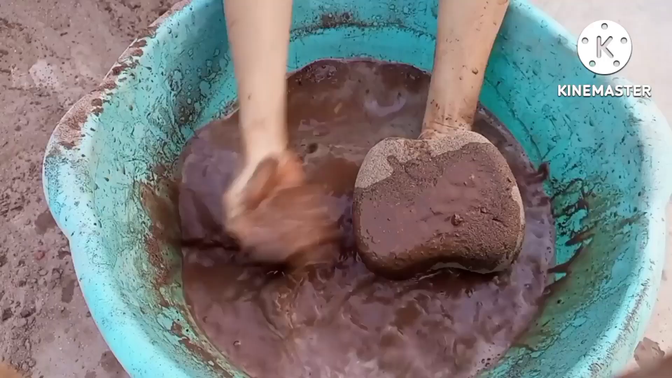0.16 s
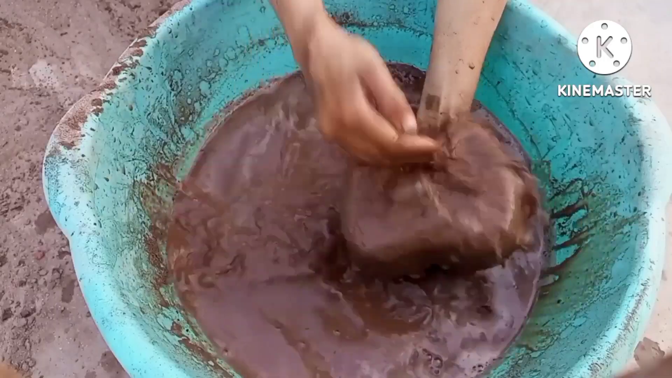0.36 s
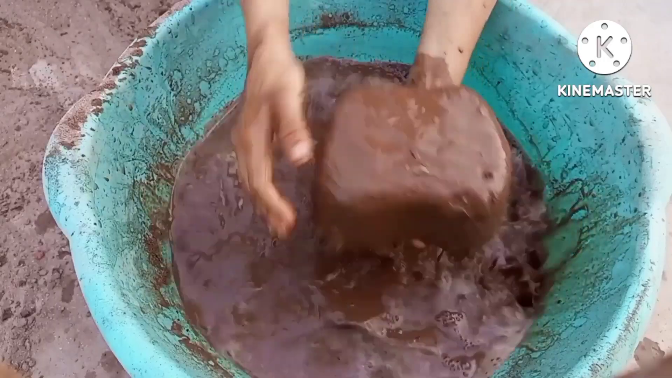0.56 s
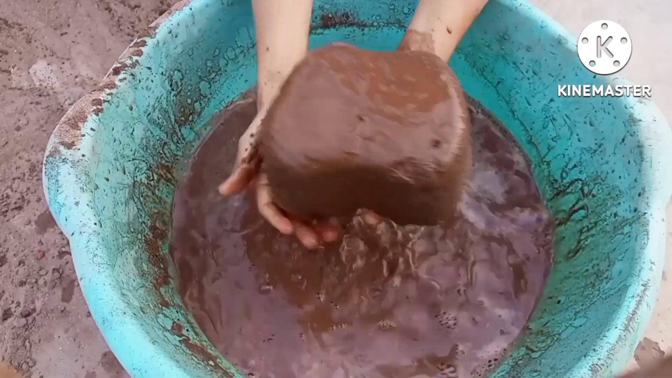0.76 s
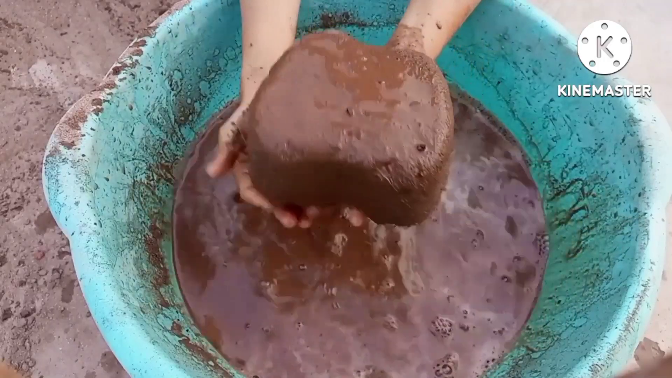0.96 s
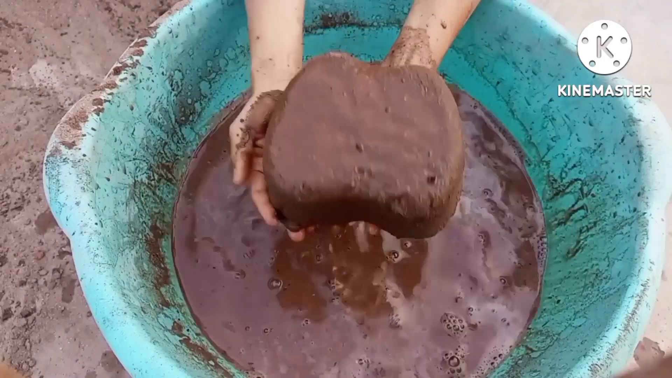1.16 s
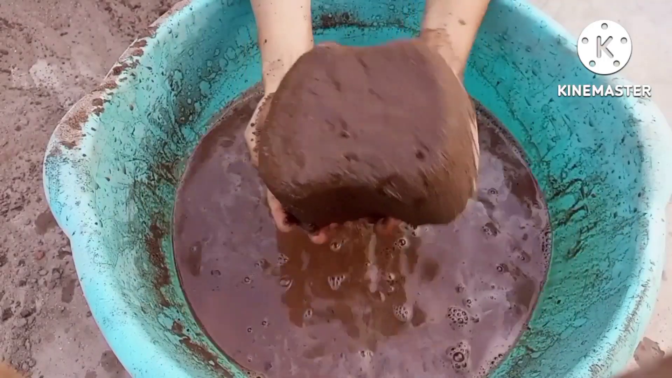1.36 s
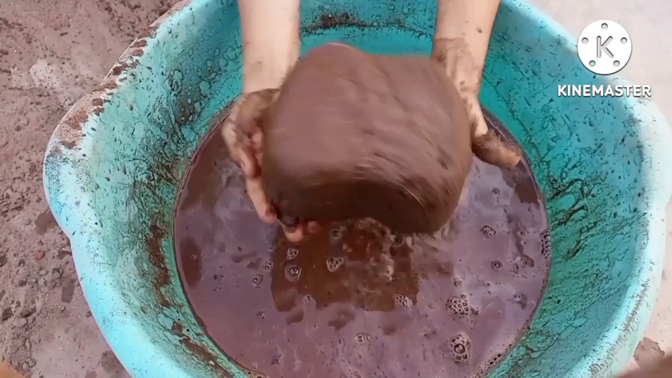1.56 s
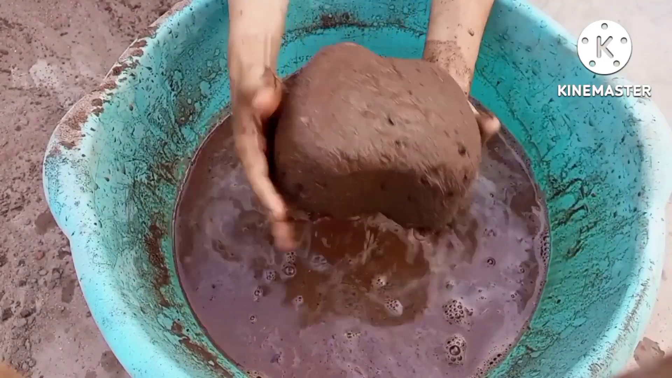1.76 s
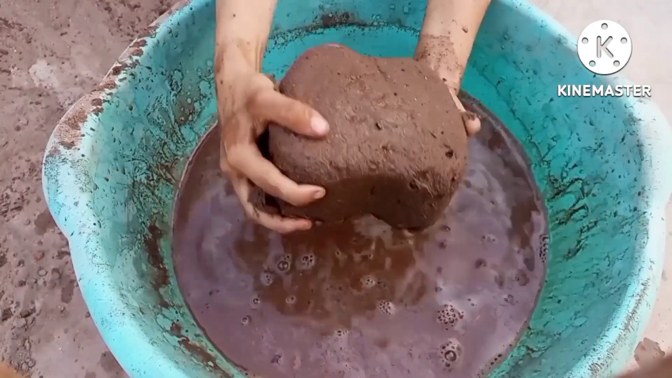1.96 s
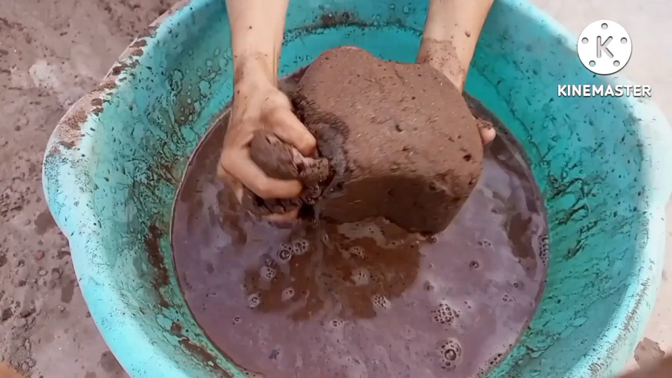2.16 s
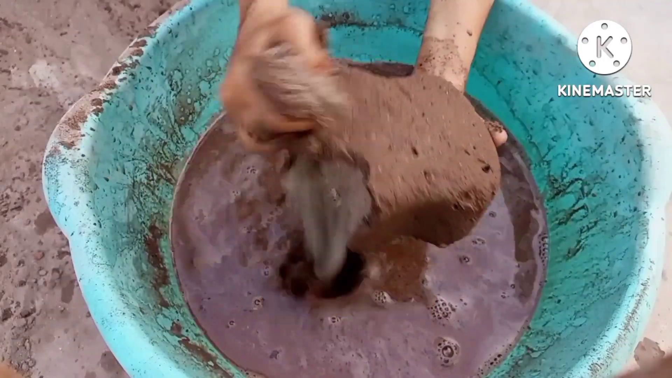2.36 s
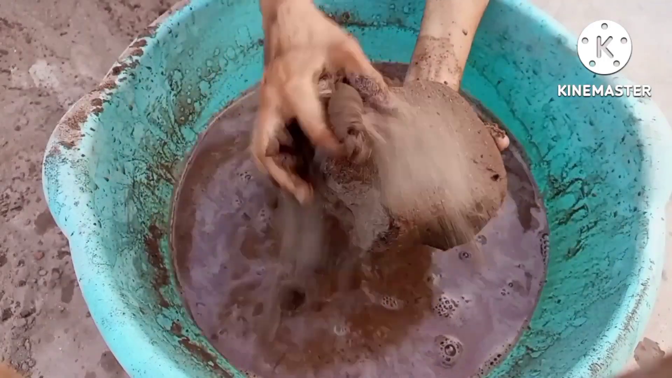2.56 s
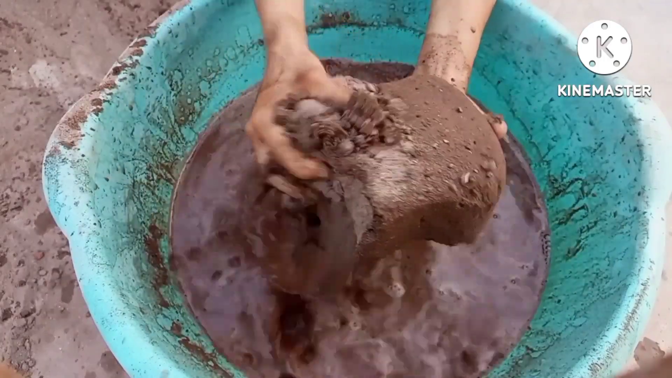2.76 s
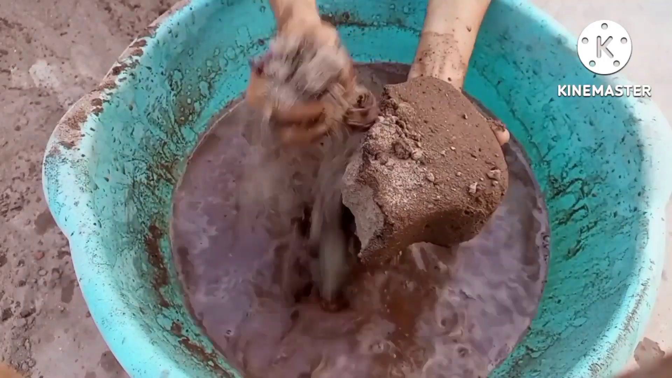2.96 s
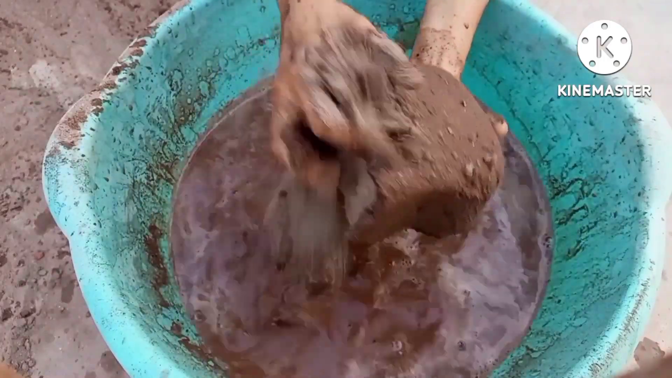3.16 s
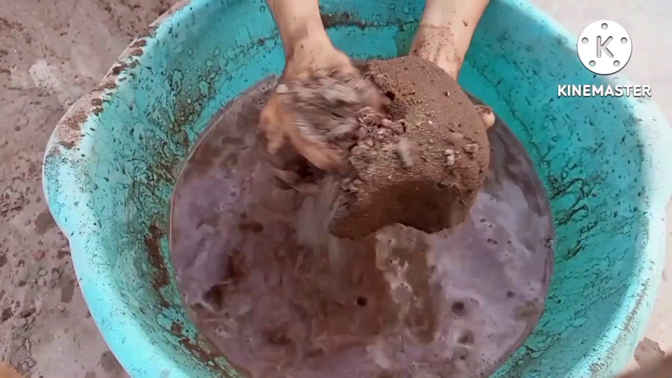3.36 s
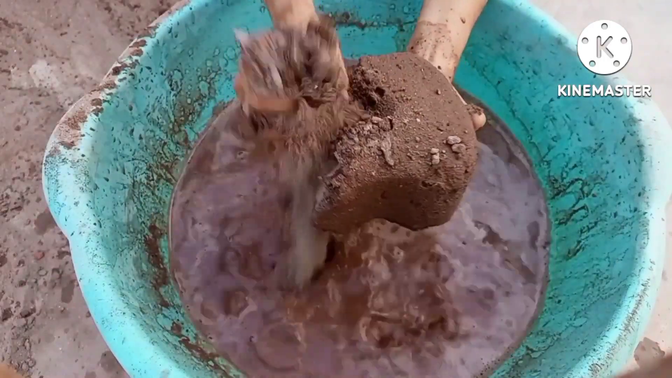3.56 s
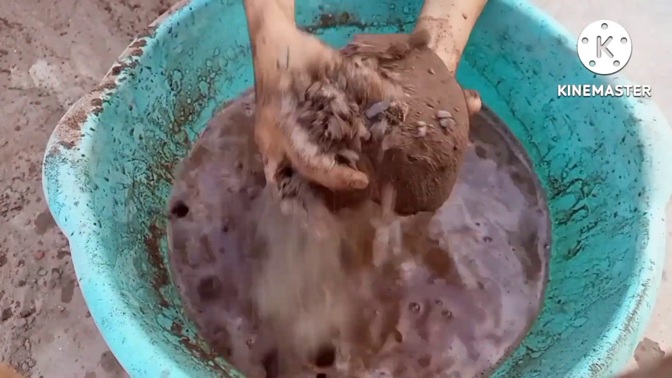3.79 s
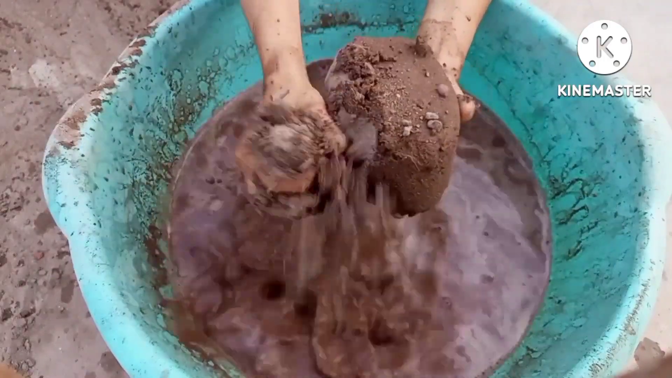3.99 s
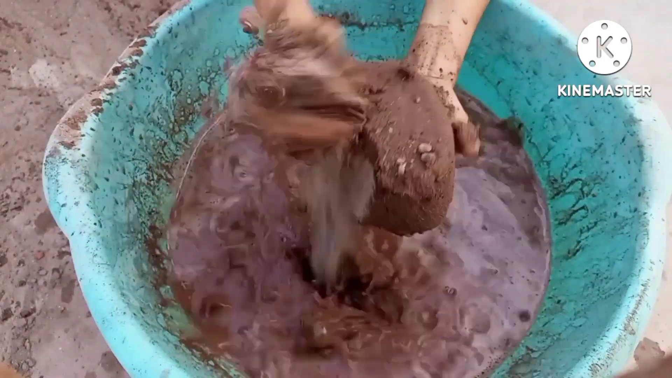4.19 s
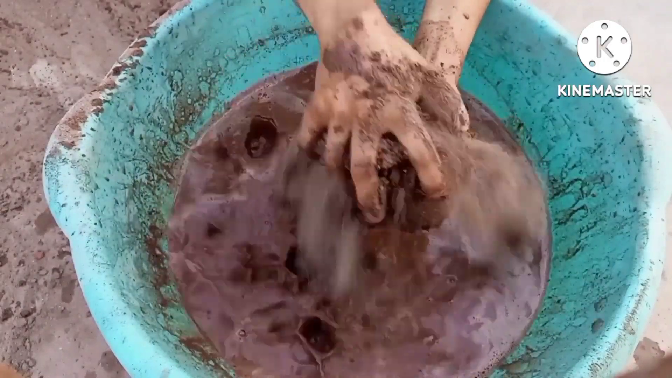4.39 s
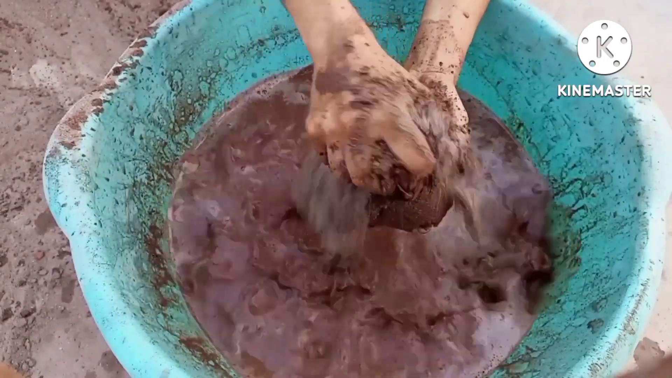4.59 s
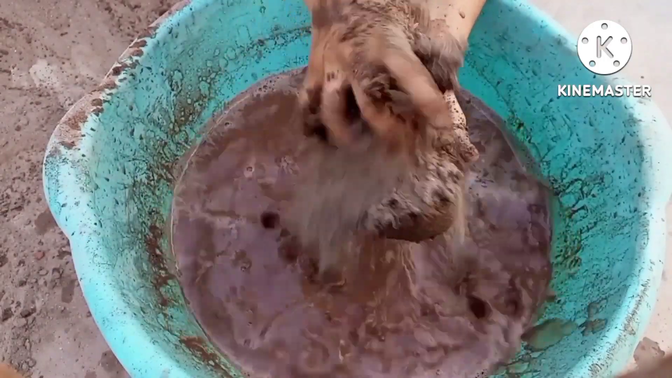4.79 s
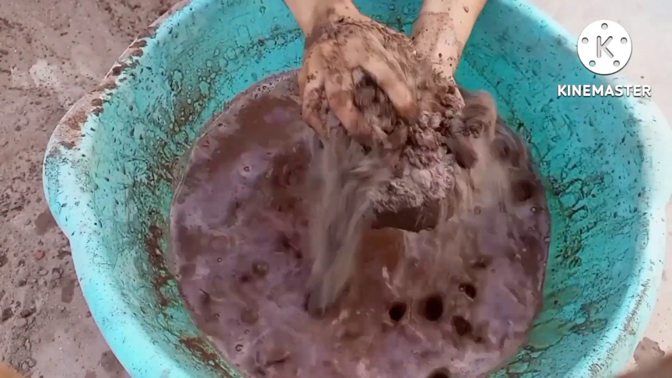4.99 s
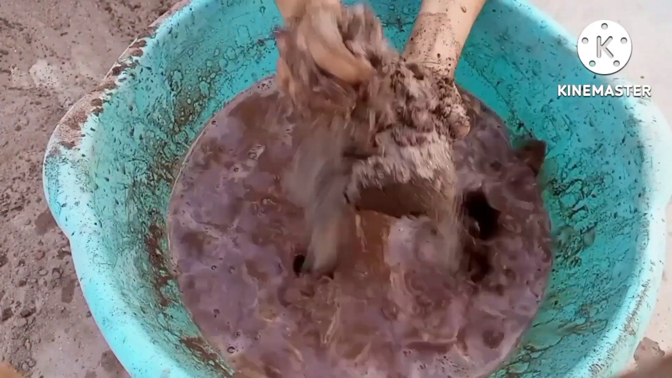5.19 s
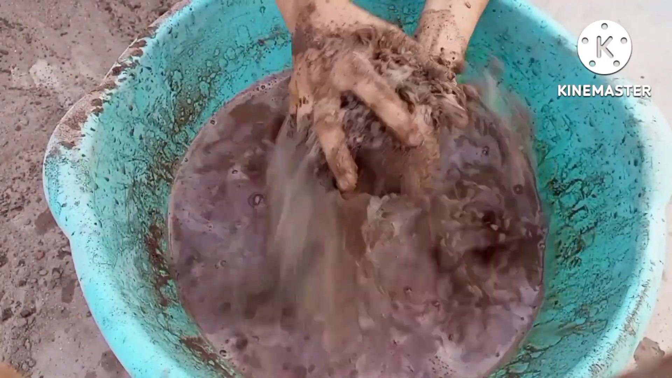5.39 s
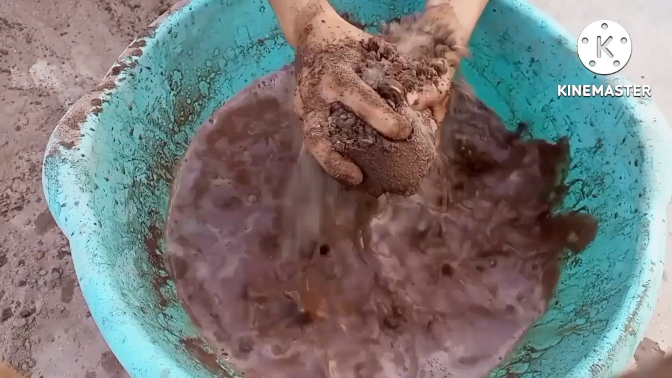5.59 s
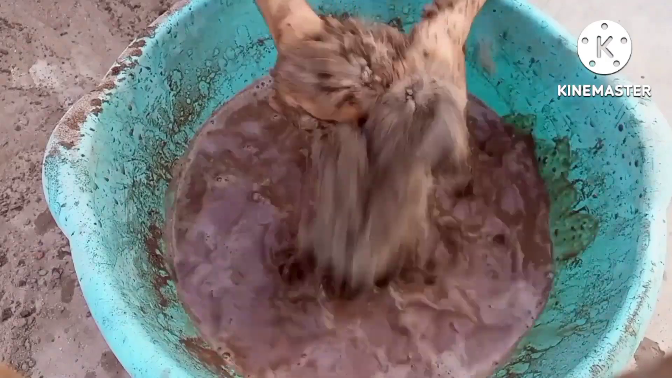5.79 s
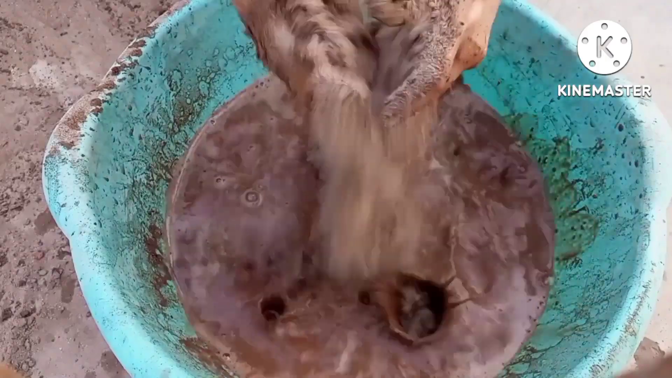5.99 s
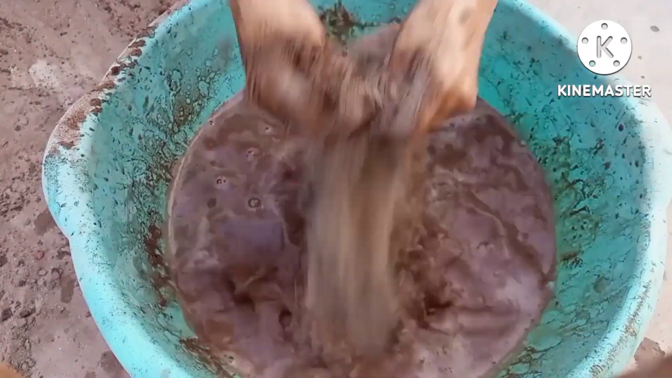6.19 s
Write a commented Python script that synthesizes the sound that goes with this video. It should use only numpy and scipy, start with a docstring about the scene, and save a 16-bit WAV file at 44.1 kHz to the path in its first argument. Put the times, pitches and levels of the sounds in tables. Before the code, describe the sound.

Close-up crumbling of a wet sand block over a tub of water: dripping, a lull, then gritty pattering, sharp splashes and bubbly plops.

```python
"""Drops and sand fall at once into muddy water in a plastic tub: flurries of bubbles over a fizz of grains.
Sharp splats and ringing bubbles join in; just before 1 s gusts of wind rumble on the close microphone.
After a lull, fingers dig with a smooth hiss from 2.2 s into a block of wet sand held over the water.
The heaviest falls come near 3 s and overload the microphone; crumbling lumps patter on to the end.
Resonances and a short echo give the tub's colour; rubbing, wind and air noise are heard without it."""
import sys
import numpy as np
from scipy import signal
from scipy.fft import rfft, irfft, next_fast_len
from scipy.io import wavfile
from scipy.ndimage import uniform_filter1d

SR = 44100
rng = np.random.default_rng(int(sys.argv[2]) if len(sys.argv) > 2 else 0)


def makeup_ratio(level_db):
    """Linear amplitude ratio for a level in decibels (20 dB per factor of ten)."""
    decades = np.asarray(level_db, float) / 20
    return 10 ** decades


def to_wav(s):
    """Save 16-bit WAV."""
    ch = np.atleast_2d(s).T  # columns
    pcm = np.round(np.clip(ch, -1, 1) * 32767)  # PCM
    wavfile.write(sys.argv[1], SR, pcm.astype(np.int16))


N = 275184


def evened(x):
    """Scales to rms 1."""
    return x / np.sqrt(np.mean(x ** 2) + 1e-20)


def curve(rows, column):
    """Draws one column of a table as straight lines, sample by sample."""
    table = np.array(rows)
    return np.interp(np.arange(N) / SR, table[:, 0], table[:, column])


def add(mix, s, sound):
    """Mixes a sound in at a time in seconds."""
    part = mix[round(s * SR):][:len(sound)]
    part += sound[:len(part)]


def impulses(rows, delay_s=0):
    """One click for each (time [s], level [dB]) row."""
    clicks = np.zeros(N)
    for s, db in rows:
        add(clicks, s + delay_s, makeup_ratio([db]))
    return clicks


def coloured(x, points):
    """Filters by a spectrum of (frequency [Hz], level [dB]) points, joined on a log frequency scale."""
    size = next_fast_len(len(x))
    hz, db = np.transpose(points)
    shape = np.interp(np.log(np.fft.rfftfreq(size, 1 / SR) + 1), np.log(hz), db)
    return irfft(rfft(x, size) * makeup_ratio(shape), size)[:len(x)]


def coloured_noise(points):
    """Steady noise of a given colour; rms 1."""
    return evened(coloured(rng.standard_normal(N), points))


def smooth_noise(window):
    """Slow random drift, averaged twice over a window in samples; rms 1."""
    return evened(uniform_filter1d(uniform_filter1d(rng.standard_normal(N), window), window))


def sparse(per_s, spread_db):
    """Random clicks, a few much larger than the rest."""
    size = makeup_ratio(spread_db * np.minimum(rng.exponential(1, N), 4))
    sign = rng.choice([-1., 1.], N)
    return size * sign * (rng.random(N) < per_s / SR)


def lump(rise, fall):
    """An envelope that builds up to time zero at its middle and then dies (time constants in s); peak 1."""
    t = np.arange(-4000, 4001) / SR
    return np.exp(np.where(t < 0, t / rise, -t / fall))


def bubble(hz, cycles, glide, swell=.32):
    """A pocket of air swells in, rings down and slides in pitch; envelope peak 1."""
    # u counts time in spans of the given number of cycles
    u = np.arange(int(3 * cycles / hz * SR) + 2) / SR * hz / cycles
    rise = (u / swell) ** 2 * np.exp(2 - 2 * u / swell)
    decay = np.exp(-1.6 * (u - swell) * (1 + u))
    shape = np.where(u < swell, rise, decay)
    return shape * np.sin(2 * np.pi * cycles * (u + glide * (u - .4) ** 2))


# thin trickle between the showers: (time [s], level before the mix [dB])
TRICKLE = [(0, -40), (.3, -40.5), (.66, -44), (1.0, -51), (1.2, -51), (1.9, -46), (2.4, -36.5), (2.8, -32),
           (3.35, -37), (3.75, -41.5), (4.1, -33.5), (4.25, -44), (4.55, -41.5), (4.9, -35.5), (5.1, -41),
           (5.5, -36.5), (5.87, -37.5), (6.24, -28.5)]
# trickle mix, one each for large drops, small drops, sand: (level [dB])
TRICKLE_MIX = [-10, -5, 2]
# water or sand shaken loose, coarseness up = big drops, down = fine sand:
# (start [s], length before the fade [s], level before the mix [dB], coarseness [dB])
SHOWERS = [(0.0, 0.017, -36, 4.5), (.205, 0.092, -28.5, -1.5), (0.348, 0.033, -28.5, 6.5),
           (0.428, 0.077, -30.5, 1), (.53, 0.085, -37, -4), (0.692, .11, -35.5, 2), (.89, 0.048, -33, 3.5),
           (1.04, 0.042, -60, -16), (1.65, 0.034, -67, 7), (1.97, 0.034, -42, 6), (2.26, 0.058, -38, -5),
           (2.65, 0.086, -37, -7), (2.81, 0.072, -28.5, 3.5), (2.93, .11, -25.5, -1.5),
           (3.059, 0.057, -25, 3), (3.11, .1, -26, -0.5), (3.238, 0.12, -29.5, -1), (3.368, 0.02, -30, 3.5),
           (3.48, 0.024, -34, -10), (3.524, 0.04, -25.5, -4.5), (3.62, 0.061, -30.5, 1),
           (3.799, 0.077, -32, 0.5), (3.968, 0.047, -35, -2.5), (4.041, 0.075, -31.5, 0.5),
           (4.362, 0.13, -34.5, -2), (4.66, 0.042, -30.5, -1), (4.708, 0.068, -30.5, 2),
           (4.798, 0.068, -35.5, 5.5), (4.944, 0.016, -28.5, -3), (5.0, 0.048, -47, -17),
           (5.15, 0.1, -30.5, -4), (5.258, 0.098, -26.5, 0.5), (5.42, 0.084, -41.5, -1.5),
           (5.582, 0.082, -35, 0), (5.698, .13, -27, -1), (5.92, 0.11, -32.5, -3), (6.058, .1, -28, -3),
           (6.18, 0.048, -47, -9)]
# shower mix, one each for large drops, small drops, sand: (level [dB])
SHOWER_MIX = [-5.5, -0.5, -0.5]


def falling():
    """Gains of large drops, small drops and sand: showers that swell, hold and fade over a thin trickle."""
    rise_s, fade_db_per_s = 0.013, 426
    t = np.arange(N) / SR
    power = makeup_ratio(curve(TRICKLE, 1) + np.c_[TRICKLE_MIX]) ** 2
    for start, length, db, coarse_db in SHOWERS:
        part = slice(round(start * SR), round((start + length) * SR) + SR // 5)
        since = t[part] - start
        fade = makeup_ratio(-fade_db_per_s * np.maximum(since - length, 0))
        shape = np.clip(since / rise_s, 0, 1) * fade
        mix_db = db + np.array(SHOWER_MIX) + coarse_db * np.array([1, 0, -1])
        power[:, part] += (makeup_ratio(mix_db)[:, None] * shape) ** 2
    return np.sqrt(power)


# lumpiness of the fall, held to 0.78 at most: (time [s], share from 0 smooth to 1 lumpy [ratio])
CLUMPINESS = [(0, 0.98), (.95, 1), (1.1, 0.74), (2, 0.21), (2.45, 0.81), (2.6, 0.89), (4.2, 1), (5.8, 1),
              (6.24, 0.95)]


def clumping():
    """Falling matter comes in clumps of a few milliseconds."""
    clicks = abs(sparse(per_s=150, spread_db=3))
    clumps = abs(evened(signal.oaconvolve(clicks, lump(rise=0.00055, fall=0.00085), "same")))
    share = np.clip(curve(CLUMPINESS, 1), 0, .78)
    return 1 - share + share * clumps


def drops(low_hz, high_hz, per_s, cycles, spread_db, count, clumps):
    """Many small bubbles at random; each size also comes and goes in flurries of its own."""
    out = np.zeros(N)
    for hz in np.geomspace(low_hz, high_hz, count):
        grain = bubble(hz, cycles * rng.uniform(.6, 1.8), rng.normal(.02, .04))
        # a new flurry level every 1500 samples, 3 dB spread
        flurry = makeup_ratio(3 * np.repeat(rng.standard_normal(N // 1500 + 1), 1500)[:N])
        seethe = 0.013 * rng.standard_normal(N)  # countless tiny ones merge into a wash
        clicks = sparse(per_s / count, spread_db) + seethe
        out += signal.oaconvolve(clicks * clumps * flurry, grain)[:N]
    return evened(out)


# colour of sand and splats, with a microphone peak near the top: (frequency [Hz], level [dB])
SAND_COLOUR = [(1470, -5.5), (2500, 2), (2900, 4.5), (3770, -3), (6500, 5.5), (8020, -1.5), (11600, 14),
               (15200, -5.5), (16000, -74)]


def sand(clumps):
    """Fine grains rain on the water as a dense crackle of clicks."""
    grains = sparse(per_s=14000, spread_db=3.0)
    return evened(coloured(grains * clumps, SAND_COLOUR))


# air modes of the tub: (frequency [Hz], width [Hz], level among the modes [dB])
TUB_MODES = [(475, 40, 5), (688.6, 20, 1), (933, 24, 2.5), (1223, 125, -6), (2007, 98, -7.5),
             (2213, 48, -3), (2916, 130, -2.5), (3190, 20, -14), (4300, 180, -5.5), (4770, 46, -2),
             (5526, 244, -1), (6700, 92, 1), (7350, 460, -5.5), (8070, 66, 4.5)]


def tub(x, modes_db=1.5, echo_db=-5.5, echo_t60=0.048, dull_hz=4000):
    """The tub rings at its modes and returns a short, dull, scattered echo."""
    t = np.arange(6000) / SR
    ring = np.zeros(len(t))
    for hz, width, db in TUB_MODES:
        decay = np.exp(-np.pi * width * t)
        ring += makeup_ratio(db) * 2 * np.pi * width / SR * decay * np.cos(2 * np.pi * hz * t)
    echo = rng.standard_normal(len(t)) * makeup_ratio(-60 * t / echo_t60) * (t > .002)
    echo = signal.lfilter(*signal.butter(1, dull_hz, fs=SR), echo / np.linalg.norm(echo))
    return x + signal.oaconvolve(x, makeup_ratio(modes_db) * ring + makeup_ratio(echo_db) * echo)[:N]


# wind rumble on the microphone: (time [s], level before its lumps [dB])
WIND = [(0, -54.5), (.45, -40), (.8, -58), (.85, -31), (.9, -25), (1.04, -35), (1.17, -35), (1.25, -40),
        (1.31, -33), (1.42, -52), (1.6, -45), (2.2, -40.5), (3.2, -55), (4.3, -60), (4.6, -48.5),
        (4.9, -56.5), (5.2, -39.5), (5.8, -55), (6.05, -37.5), (6.24, -49)]
# low thumps, the one at 3.196 s probably an overload click:
# (time [s], peak [dB], frequency [Hz], length scale [cycles])
THUMPS = [(0.871, -6.5, 110, 2.7), (0.904, -12, 113, 3.16), (0.94, -2, 94.4, 4.1), (0.955, -6, 195, 8),
          (0.975, 3, 292, 3.94), (0.986, -3, 106, 3.75), (3.196, -28, 200, 1.3), (4.057, -15, 147, 0.64),
          (5.246, -12, 95, 2.6), (5.247, -27, 363, 12), (5.771, -18, 360, 11)]


def wind():
    """Lumpy low rumble of noise, and low thumps that swell and ring down as short sine bursts."""
    low = coloured_noise([(20, -34), (45, -8), (80, -4.5), (140, 6), (190, -7.5), (300, -42.0)])
    lumps_db = 0.87 * smooth_noise(1200)
    out = makeup_ratio(curve(WIND, 1) + lumps_db) * low
    for s, db, hz, cycles in THUMPS:
        add(out, s, makeup_ratio(db) * bubble(hz, cycles, 0))
    return out


# colour of the air noise: (frequency [Hz], level [dB])
AIR_COLOUR = [(88, -38), (150, -2.5), (431, -5), (514, -10), (1450, -20), (1830, -24), (2600, -51),
              (7920, -57), (11000, -24), (16000, -47)]


def outdoor_air():
    """Steady air noise whose floor sinks wherever the rumble curve dips below a set level."""
    level_db, floor_db = -46.5, -51.5
    follow = 0.9  # dB of sinking per dB of rumble below the floor
    below_floor_db = np.minimum(curve(WIND, 1), floor_db) - floor_db
    return makeup_ratio(level_db + follow * below_floor_db) * coloured_noise(AIR_COLOUR)


# sharp splats on the surface: (time [s], level before the burst is shaped [dB])
SPLATS = [(0.0326, -17.5), (0.0731, -14), (0.212, -11.5), (0.2184, -5), (0.2559, -6), (0.274, -10),
          (0.307, -18), (0.355, -16), (0.383, -15), (0.4882, -15), (0.5407, -9.5), (0.7335, -3),
          (0.7525, -4), (0.77, -8), (0.789, -9.5), (0.9238, -12.5), (1.8733, -22), (1.9729, -15.5),
          (2.5097, -19), (2.5466, -20), (2.5634, -7), (2.5982, -2), (2.6723, -8.5), (2.8364, -8),
          (2.8725, -3), (2.904, -12), (2.9402, -7), (2.9508, -10), (3.0016, 3.5), (3.057, -1),
          (3.1103, -13.5), (3.1448, 0.5), (3.194, -3.5), (3.251, -6), (3.277, -23), (3.3055, -6),
          (3.3443, -14.5), (3.5339, -2.5), (3.7884, -18.5), (3.822, -25), (3.8731, -8.5), (3.9085, -18),
          (4.0548, -31), (4.12, -12), (4.1963, -18.5), (4.4432, -17), (5.1575, -12), (5.2749, -6),
          (5.3058, -9), (5.451, -16), (5.5603, -18), (5.67, -14), (5.7725, -4), (5.9666, -12.5),
          (5.9891, -9), (6.0886, -7.5), (6.123, -6.5)]


def splats():
    """A burst of bright noise with a short build-up and a short fall."""
    hits = impulses(SPLATS, delay_s=0.0016)
    envelope = lump(rise=0.00053, fall=0.0021) + 0.36 * lump(rise=0.0025, fall=0.0027)
    shape = signal.oaconvolve(hits, envelope, "same")
    return shape * evened(coloured(sparse(per_s=9500, spread_db=1.5), SAND_COLOUR)) / 2


# the clearest bubbles, and one soft long hum of the tub at 2.6 s (674 Hz):
# (time [s], peak before the waver [dB], pitch [Hz], shortest length scale [cycles])
BUBBLES_AND_HUM = [(0.1287, -18.5, 5070, 14), (0.2217, -7, 2860, 13), (0.2382, -17, 837, 24),
                   (0.2552, -10.5, 3450, 11), (0.2546, -4.5, 6260, 11), (0.259, -6, 2100, 5.5),
                   (0.2707, -6.5, 900, 4.9), (0.2747, -11, 3300, 9.5), (0.356, -10.5, 6900, 9),
                   (0.3557, -8.5, 3350, 4.2), (0.352, -11.5, 934, 17.4), (0.3596, -6, 1100, 3),
                   (0.3751, -9.5, 1930, 6.6), (0.337, -25, 1390, 28), (0.557, -19.5, 1020, 8.3),
                   (0.5757, -13, 1530, 4.1), (0.687, -19, 7470, 66), (0.6906, -19.5, 1950, 22),
                   (0.7165, -15, 2480, 11), (0.7308, -17, 750, 14), (0.7355, -3.5, 8170, 10),
                   (0.7546, -4.5, 1450, 4.4), (0.7533, -1, 3670, 5.1), (0.7631, -20, 1090, 16),
                   (0.892, -12.5, 1960, 10), (0.9059, -17, 690, 16), (1.379, -23.5, 2020, 13),
                   (1.432, -13, 4800, 13.4), (1.479, -39, 1410, 18), (1.5425, -13, 2530, 16),
                   (1.844, -17, 8270, 27), (1.8892, -20, 7400, 25), (1.987, -22.5, 710, 7.1),
                   (1.9874, -12, 4940, 9), (2.1342, -7, 2185, 13), (2.4764, -5.5, 2160, 10.5),
                   (2.545, -13.5, 5420, 45), (2.3, -28, 395, 10.5), (2.5585, -7.5, 2830, 15.5),
                   (2.563, -25, 1180, 18), (2.78, -31, 980, 17), (2.6, -38.5, 674, 143),
                   (2.6, -13, 3300, 6.7), (2.625, -11, 5690, 15), (2.6917, -11, 2596, 27),
                   (2.806, -12.5, 3240, 23), (2.8178, -14, 792, 10.7), (2.832, -15, 4300, 31),
                   (2.84, -17, 1235, 18), (2.839, -13, 2540, 9.5), (2.8406, -5, 7470, 11),
                   (2.8721, -4.5, 3330, 4.1), (2.9043, -15, 900, 12.6), (2.972, -7, 1268, 25),
                   (2.988, -8.5, 1030, 12), (2.99, -6, 7000, 12), (2.992, 15, 2680, 5.6),
                   (3.0237, -1.5, 1800, 4), (3.0583, 1, 5880, 7.9), (3.0716, 2, 3240, 4.4),
                   (3.072, -12, 820, 6.3), (3.0825, -10, 3250, 8.6), (3.092, -5.5, 4670, 28),
                   (3.097, -14, 3160, 11), (3.1133, -5.5, 3200, 4.2), (3.147, -8, 3940, 6.4),
                   (3.1658, -9.5, 2100, 6.4), (3.1844, -8, 2700, 8.8), (3.1919, -8.5, 605, 5.6),
                   (3.194, -2, 3900, 6.1), (3.195, -9.5, 2240, 10.6), (3.2513, -13, 2900, 13),
                   (3.3083, -14.5, 1035, 9.3), (3.307, -17.5, 4040, 33), (3.3759, -17.5, 1870, 13),
                   (3.4327, -16, 1885, 16.4), (3.5304, -17.5, 1117, 13), (3.536, -7.5, 2740, 4.2),
                   (3.5442, -14.5, 2990, 12), (3.6249, -11.5, 3360, 8.9), (3.655, -19, 665, 9.6),
                   (3.7565, -17, 1000, 24), (3.79, -12.5, 2130, 10), (3.8186, -18.5, 737, 5.9),
                   (3.8283, -19, 737, 12), (3.8754, -9, 3460, 8.2), (3.8747, -3.5, 7660, 11),
                   (3.9405, -13, 5640, 8.5), (4.0579, -10, 4600, 7.1), (4.057, -6, 2056, 14),
                   (4.0593, 0.5, 1136, 3.3), (4.08, -18.5, 895, 5), (4.0901, -10, 3150, 8.1),
                   (4.3484, -19.5, 1330, 13), (4.376, -15.5, 4300, 8.6), (4.4242, -9, 6420, 10),
                   (4.437, -19.5, 1950, 27), (4.4446, -10.5, 751, 8.6), (4.5697, -10, 2280, 5.4),
                   (4.6587, -14, 2210, 22), (4.6615, -15.5, 1276, 15), (4.663, -9.5, 5150, 7.9),
                   (4.7115, -14.5, 882, 14.4), (4.722, -8, 2020, 5.8), (4.8025, -14, 2420, 4.6),
                   (4.832, -12.5, 728, 12.3), (4.9476, -7, 1040, 8.1), (4.9502, -6.5, 1954, 19.5),
                   (4.963, -14, 4300, 17), (5.0355, -7, 6360, 9.8), (5.082, -19.5, 1870, 14),
                   (5.1528, -12.5, 754, 5.1), (5.1643, -24.5, 675, 26), (5.1648, -11, 1425, 6.5),
                   (5.269, -4.5, 2180, 3.5), (5.27, -10.5, 6360, 14), (5.2753, -8, 706, 5.1),
                   (5.287, -11, 2970, 8.9), (5.299, -16, 3540, 20), (5.3221, -6.5, 1130, 5),
                   (5.3409, -21.5, 760, 20), (5.3641, -2, 2750, 3.6), (5.38, -8, 4300, 9),
                   (5.4733, -17, 1232, 15), (5.5158, -20, 1950, 15), (5.5982, -17, 1620, 6.8),
                   (5.6154, -2, 3440, 9.5), (5.6261, -11, 2990, 16), (5.7043, -20, 1380, 15),
                   (5.699, -28, 440, 6.3), (5.7351, -5.5, 6360, 9), (5.7536, -3, 6360, 11),
                   (5.7628, -8, 2830, 5), (5.7708, -5, 782, 6.5), (5.7753, -11.5, 4630, 12),
                   (5.8126, -15.5, 1760, 5.7), (5.9372, -14, 977, 17), (5.9718, -16.5, 1650, 5.8),
                   (6.002, -13.5, 1360, 21), (6.0194, -6.5, 1850, 4.4), (6.029, -5.5, 1203, 8.4),
                   (6.051, -15.5, 1930, 20), (6.089, -11, 1940, 11), (6.1874, -8, 5350, 30)]


def clear_bubbles_and_hum():
    """Air pockets ring one by one, each with a small pitch slide; a soft hum is made the same way."""
    out = np.zeros(N)
    slides = rng.normal(.02, .04, (len(BUBBLES_AND_HUM), 1))
    for (s, db, hz, cycles), glide in zip(BUBBLES_AND_HUM, slides):
        # no ring is scaled shorter than 5 cycles or 1.8 ms
        add(out, s, makeup_ratio(db) * bubble(hz, max(cycles, 5, .0018 * hz), glide))
    # the churning surface makes the rings waver in strength
    return out * (1 + .33 * smooth_noise(70))


# colour of the torn water around the landings: (frequency [Hz], level [dB])
SPRAY_COLOUR = [(180, -31), (400, -1.5), (570, -13), (689, -11), (1610, -6), (2840, 0), (8790, -6),
                (10900, 0), (15000, -15), (16000, -39)]


def spray(landings, level_db=-11.0):
    """Ragged noise that gathers before each landing and washes on after it."""
    shape = lump(rise=0.0011, fall=0.0033)
    power = signal.oaconvolve(landings ** 2, shape / shape.sum(), "same")
    ragged = evened(coloured(sparse(per_s=3500, spread_db=5.5), SPRAY_COLOUR))
    return makeup_ratio(level_db) * np.sqrt(abs(power)) * ragged


# fingers dig into the block: (time [s], level [dB])
DIGS = [(2.2, -28.5), (2.286, -20), (2.375, -27.5), (2.48, -24)]
# colour of the rubbing: (frequency [Hz], level [dB])
BLOCK_COLOUR = [(290, -44), (500, -6), (728, -2), (1310, -23), (2250, 5), (2520, -1), (2860, 11),
                (3960, -8), (4480, 1), (6130, -23), (7040, 4), (8600, -25), (10000, -1), (13000, -43),
                (22000, -120)]


def rub():
    """A smooth hiss each time the fingers press into the sand."""
    pressing = signal.oaconvolve(impulses(DIGS), lump(rise=0.018, fall=0.026), "same")
    return pressing * coloured_noise(BLOCK_COLOUR)


def scene():
    """Everything that falls passes the tub; rubbing, wind and outdoor air do not."""
    clumps = clumping()
    large = drops(low_hz=630, high_hz=1500, per_s=900, cycles=7, spread_db=2, count=16, clumps=clumps ** .3)
    small = drops(low_hz=1770, high_hz=8400, per_s=2600, cycles=11.6, spread_db=5.5, count=30,
                  clumps=clumps ** .5)
    slosh = drops(low_hz=390, high_hz=520, per_s=200, cycles=7, spread_db=2, count=8, clumps=1)
    grains = sand(np.sqrt(clumps * clumping()))
    large_gain, small_gain, sand_gain = falling()
    fall = large_gain * (large + makeup_ratio(-11) * slosh) + small_gain * small + sand_gain * grains
    ringing = clear_bubbles_and_hum()
    in_tub = tub(fall + ringing + spray(ringing) + splats())
    return (in_tub + rub() + wind() + outdoor_air())[None]


def top_cut(x):
    """Nothing passes above the cut-off."""
    return signal.sosfilt(signal.butter(12, 16320, fs=SR, output="sos"), x)


def record(dry):
    """The microphone adds a small constant offset and overloads: the loudest peaks clip at full scale."""
    offset = -.0059
    mix = np.clip(dry + offset, -1, 1)
    return top_cut(mix)


dry = scene()
out = record(dry)
to_wav(out)
```